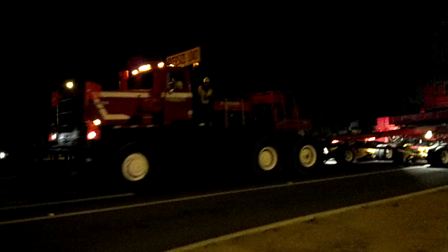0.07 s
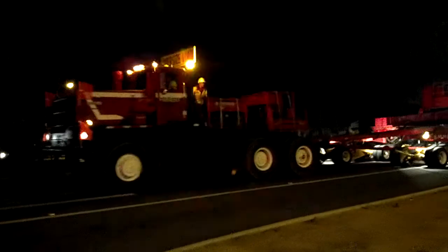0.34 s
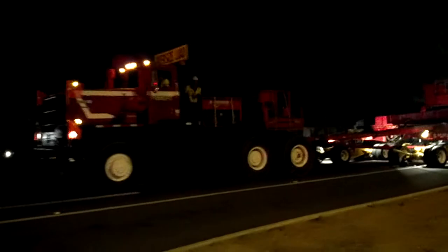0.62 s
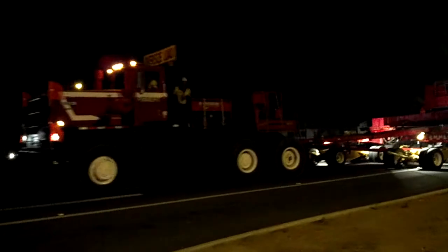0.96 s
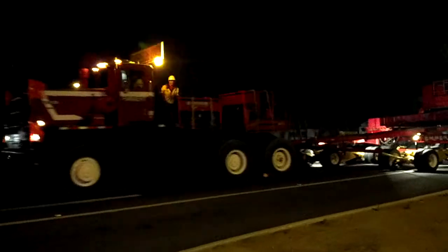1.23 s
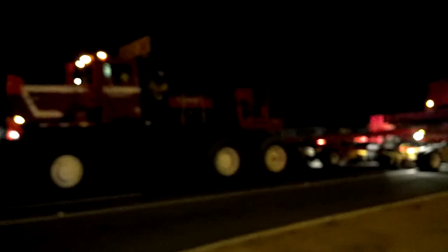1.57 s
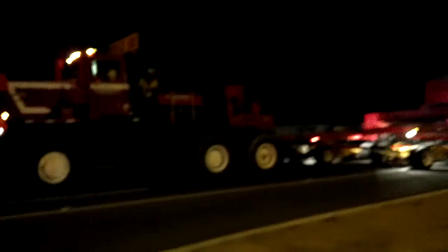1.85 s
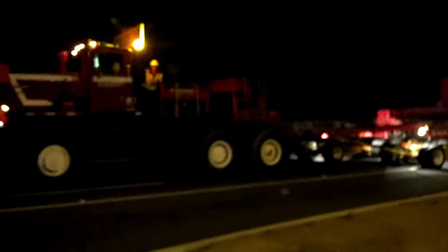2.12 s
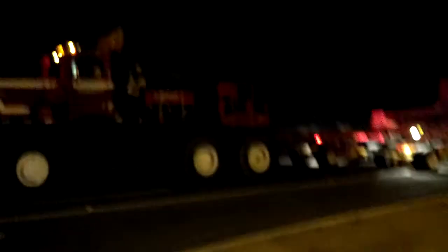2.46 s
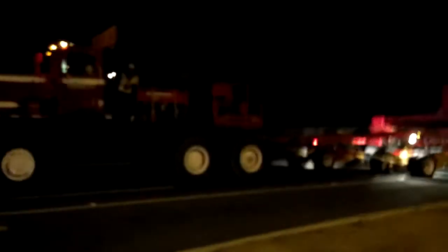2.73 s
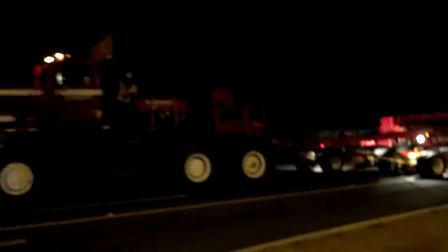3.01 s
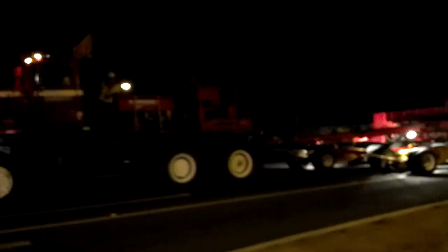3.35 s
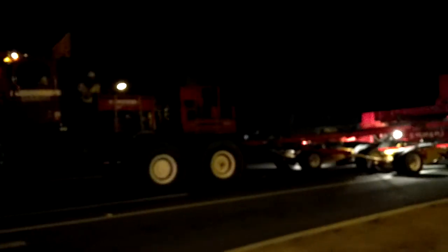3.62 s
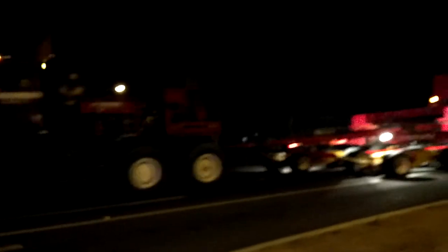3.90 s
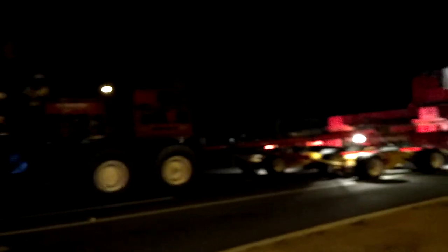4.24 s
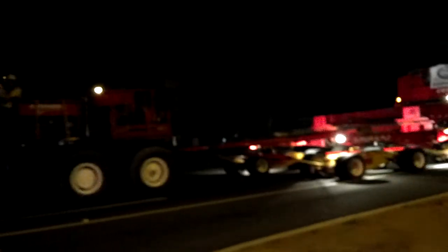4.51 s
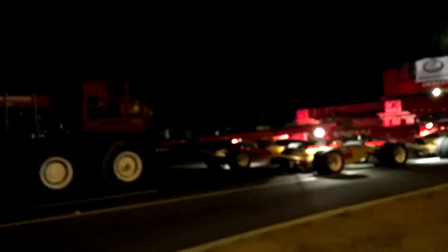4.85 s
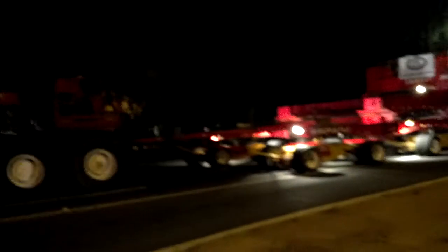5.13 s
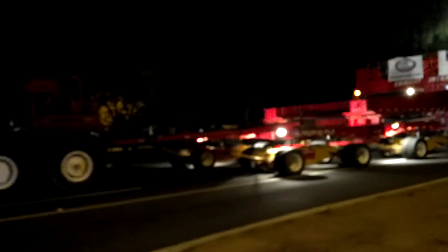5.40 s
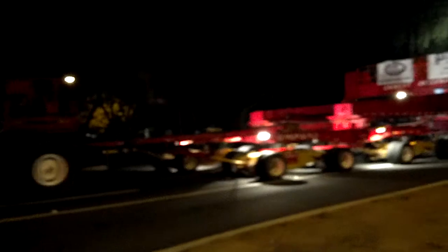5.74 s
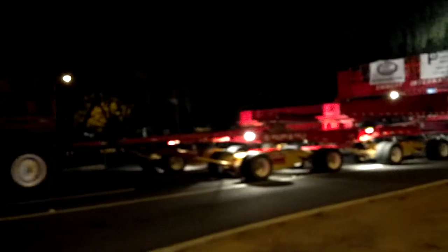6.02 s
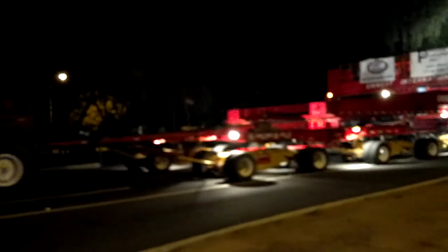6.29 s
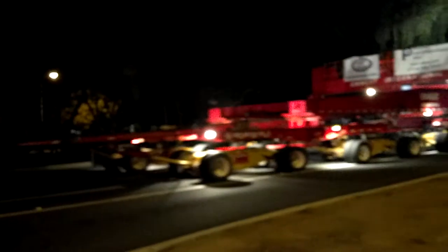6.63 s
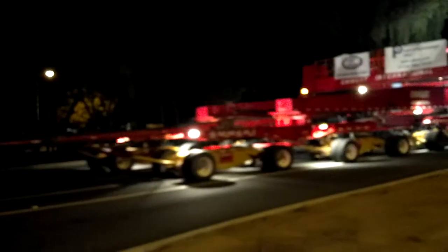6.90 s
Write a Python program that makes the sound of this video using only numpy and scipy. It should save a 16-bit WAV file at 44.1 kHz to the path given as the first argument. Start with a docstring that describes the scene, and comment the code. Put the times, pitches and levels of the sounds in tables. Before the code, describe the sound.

A deep diesel throb fades in as a heavy truck crawls along a road, hauling a long trailer. The exhaust rumbles steadily while the engine roars and clatters, passing close by. Loose steel clinks lightly now and then, and a belt gives two faint, very high bouts of chirping. A fan hum and the drone of the trailer's power unit grow toward the end, in wide stereo.

```python
"""A deep diesel throb fades in: a heavy tractor crawls past, hauling a trailer with a droning power pack.
The firing cylinders make the exhaust rumble, the engine block roar and the valve gear clatter.
A cooling fan hums, gears whine faintly, a slipping belt chirps in two bouts and loose steel clinks.
Two close microphones hear the rig go by, and their stereo image is widened."""
import sys
import numpy as np
from scipy.fft import rfft, irfft, next_fast_len
from scipy.io import wavfile
from scipy.ndimage import map_coordinates

SR = 44100
rng = np.random.default_rng(int(sys.argv[2]) if len(sys.argv) > 2 else 0)


def generate_wav(signal):
    """Clip the signal to [-1, 1] and save it as 16-bit WAV at the path in sys.argv[1]."""
    frames = np.transpose(np.atleast_2d(signal))
    scaled = np.clip(frames, -1, 1) * 32767
    pcm = np.round(scaled).astype(np.int16)
    wavfile.write(sys.argv[1], SR, pcm)


N = 311346
T = np.arange(N) / SR

SHAFT_HZ, PACK_HZ = 22.46, 70.12  # crankshaft turns and power pack beats per second
CYLINDERS, FAN_BLADES, SPEED_M_PER_S = 6, 7, 1.8

# gear whines: (f/Hz, level/dB)
GEAR_WHINES = [(447, -51), (581, -51.5), (629, -51), (839, -52.5), (982, -52), (1906, -60), (2151, -51.5),
               (2290, -54)]
# clinks of loose steel: (t/s, relative level/dB, f/Hz, time to die by 60 dB/s, scrape against ring/dB)
CLINKS = [(1.672, -43, 6000, .12, -2), (2.02, -43, 6460, .1, 2), (2.3444, -42, 6500, .1, 3),
          (2.582, -39, 6300, .12, -7), (3.2994, -35, 6200, .11, -12), (3.3594, -41, 6200, 0.11, -4),
          (3.6884, -37, 6300, .07, -5), (3.782, -30, 3700, 0.077, -12), (3.8694, -37, 6350, .11, -7),
          (4.0432, -33, 6090, 0.054, -9), (4.3959, -35.5, 6240, .15, -13), (5.1716, -36, 7170, 0.13, -4),
          (5.8894, -36, 6590, 0.2, -10), (6.1609, -32, 6230, .07, -16), (6.4782, -35, 6230, .06, -14),
          (6.8409, -34.5, 6900, .12, -9)]
# bouts of belt slip: (loudest at t/s, level/dB, f/Hz, fall in pitch/(Hz per s))
BELT_SLIPS = [(2.29, -46.3, 14000, 350), (6.798, -46.5, 14270, 1100)]
# hums as the rig shows different sides: (t/s, fan level/dB, its octave/dB, power pack's octave/dB)
HUM_LEVELS = [(1.25, -28, -45, -47), (1.75, -36, -36, -43), (2.3, -26.5, -42, -30), (3.1, -32, -48, -34),
              (3.75, -27.5, -35, -40), (4.25, -26, -34.5, -28), (4.8, -27.5, -27.5, -23.5),
              (5.3, -22.5, -36, -24), (5.6, -22.5, -36.5, -26), (6.35, -20, -33.5, -28),
              (7.0, -19.5, -37, -27)]
# the power pack's casing, hidden while the tractor is alongside: (t/s, level/dB)
CASING_LEVELS = [(1.8, -41), (2.7, -38), (3.4, -39.5), (4.3, -43), (4.6, -42.5), (5.05, -42.5), (5.4, -38),
                 (6.0, -37), (6.6, -39)]
# brief swells and dips of the engine sound: (t/s, level change/dB)
SWELLS = [(2.44, 1.2), (2.68, -0.5), (3.0, 1.2), (3.14, 0), (3.32, 2), (3.55, -1), (3.9, 0.5), (4.4, -2.7),
          (5.02, -2), (5.55, 0.7), (6.3, 0.7), (6.72, -0.8), (6.95, -0.4)]
# ringing engine panels: (f/Hz, width/Hz, relative level/dB)
PANEL_RINGS = [(579, 17, -4.5), (729, 32, -8), (793, 30, -12.5), (847, 45, -10), (1020, 55, -10),
               (1147, 30, -10)]
# the tone colour of each noise: (f/Hz, relative level/dB)
SCRAPE_COLOUR = [(1500, -20), (3500, -8), (6400, -3), (10500, 1), (14000, -3), (15700, -12)]
PACK_COLOUR = [(60, -20), (150, -4), (260, 7), (370, 5.5), (520, -1), (640, -17), (900, -33)]
CASING_COLOUR = [(1300, -13), (1600, -0.5), (1750, 5), (1920, 10), (2050, 6), (2300, 1.5), (2800, -35),
                 (4000, -9.5)]
CLATTER_COLOUR = [(1200, -34), (2500, -2.5), (3400, 1.5), (4200, 0), (4600, -3), (5000, -3), (5600, -4.5),
                  (6300, -4.5), (7300, -7), (8300, -63), (11000, -56)]
SIZZLE_COLOUR = [(5000, -42), (7800, -0.5), (9000, 5), (10500, -3), (12500, 1), (14000, -3), (15000, -1),
                 (15700, -12)]
BLOCK_COLOUR = [(300, -56), (430, -13.5), (520, -3.5), (600, -0.5), (680, -2), (790, -1), (950, -5),
                (1200, -5.5), (1500, -12.5), (2000, -20.5), (3200, -15), (5000, -64)]
EXHAUST_COLOUR = [(20, -28), (45, -21), (80, -14), (97, -6.5), (115, 0), (190, -2.5), (250, -4), (330, -7),
                  (420, -15.5), (600, -22.5)]
# which stereo image is heard: (t/s, image: 0 = first, 1 = second, 2 = third, blended in between)
IMAGE_BLEND = [(1.2, 0.092), (2.55, 0.2), (3.1, 0.35), (4.95, 1.1), (5.25, 1.78), (7.06, 1.84)]
# the microphones' difference against their sum in each image: # (f/Hz, level/dB, share in step, share a quarter
# cycle out of step)
STEREO_FIRST = [(70, -22, 0.96, 0.04), (150, -20, 0.86, 0.11), (316, -20.5, -0.42, 0.54),
                (547, -8, 0.14, 0.61), (926, -12, -0.33, 0.56), (1550, 5, 0.37, 0.34),
                (1900, 2, 0.097, 0.51), (2300, 1, 0.57, 0.36), (3000, 7, -0.56, 0.28),
                (4500, 0, 0.5, -0.16), (6650, 4, 0.36, -0.01), (12000, 0.5, 0.21, 0.02)]
STEREO_SECOND = [(70, -20, 0.88, -0.28), (150, -21, 1, 0.46), (328, -13.5, 0.35, 0.43),
                 (560, -5.5, 0.34, 0.61), (970, -2.5, -0.2, 0.69), (1550, 8.5, 0.18, 0.35),
                 (1900, 4.5, 0.86, -0.16), (2300, 5.5, 0.69, 0.38), (3000, 2.5, 0.9, -0.31),
                 (4500, -0.5, 0.48, 0.067), (6300, 0, 0.6, -0.01), (12000, 1.5, 0.06, -0.02)]
STEREO_THIRD = [(70, -22, 0.87, 0.24), (150, -18, 0.61, 0.45), (330, -15, -0.18, 0.77),
                (600, -5.5, 0.03, 0.78), (1000, -1, -0.2, 0.63), (1550, 12, -0.6, 0.25),
                (1900, 1.5, -0.56, -0.74), (2300, -4, 0.05, -0.61), (3000, -1, 0.73, 0.02),
                (4500, -2, 0.45, 0.05), (6300, 2.5, 0.49, -0.01), (12000, 1, 0.02, 0.01)]


def amp(db):
    """Turn decibels into a gain."""
    return 10 ** (np.asarray(db) / 20)


def unit(x):
    """Scale to an average power of 1."""
    return x / np.sqrt(np.mean(x ** 2) + 1e-20)


def bump(x, width):
    """A smooth hump of height 1 around x = 0."""
    return np.exp(-(x / width) ** 2)


def wobble(rate):
    """A smooth random curve with rate new values a second."""
    return map_coordinates(rng.standard_normal(int(N * rate / SR) + 4), [T * rate], mode="nearest")


def over_pitch(rows, hz):
    """Read a table's columns at the frequencies hz, on a log scale."""
    freqs, *columns = np.transpose(rows)
    return [np.interp(np.log(hz + 1), np.log(freqs + 1), column) for column in columns]


def over_time(rows):
    """Read a table's columns at every sample."""
    times, *columns = np.transpose(rows)
    return [np.interp(T, times, column) for column in columns]


def filtered(x, response):
    """Filter x with a response given as a function of frequency."""
    size = next_fast_len(N + SR // 4, real=True)
    return irfft(rfft(x, size) * response(np.fft.rfftfreq(size, 1 / SR)), size)[..., :N]


def coloured(x, colour):
    """Give x a tone colour that ends at the table's last row, at power 1."""
    return unit(filtered(x, lambda hz: amp(over_pitch(colour, hz)[0]) * (hz < colour[-1][0])))


def add(out, start_s, sound):
    """Mix a short sound into out."""
    part = out[..., round(start_s * SR):][..., :sound.shape[-1]]
    part += sound[..., :part.shape[-1]]


def passing(loudest_at_m, half_power_m, db):
    """Level in dB of a part rolling by: direct sound weakens with distance, scattered sound stays."""
    near = 1 / (1 + ((SPEED_M_PER_S * T - loudest_at_m) / half_power_m) ** 2)
    scattered_share = 0.044
    return db + 10 * np.log10(scattered_share + (1 - scattered_share) * near)


def stretch(at_m, width_m):
    """Rises to 1 and falls again as the rig rolls over a stretch of road."""
    return bump(SPEED_M_PER_S * T - at_m, width_m)


def drone(cycles, db, waver_db, drift_rad):
    """A tone that wavers in level and phase."""
    return amp(db + waver_db * wobble(15)) * np.sin(2 * np.pi * cycles + drift_rad * wobble(12))


def gears(turns):
    """Gears whine faintly in step with the shaft; higher whines drift more."""
    return sum(drone(hz * turns / SHAFT_HZ, db, waver_db=4.0, drift_rad=hz / 1280)
               for hz, db in GEAR_WHINES)


def belt(turn_s=0.045, second_squeak_s=0.0127):
    """A slipping belt squeaks twice a turn and rubs around each squeak; a bout swells, sags and fades."""
    out = np.zeros(N)
    t = np.arange(-SR // 60, SR // 60) / SR

    def rasp(hz, width_s, blur_hz):
        """A brief, rough tone."""
        pitch_hz = hz + blur_hz * rng.standard_normal(len(t))
        return bump(t, width_s) * np.sin(2 * np.pi * np.cumsum(pitch_hz) / SR)

    for peak_s, db, pitch_hz, sag in BELT_SLIPS:
        turn_lags = np.arange(-9, 10) * turn_s
        grips_db = rng.uniform(-1, 1, len(turn_lags))  # the belt grips differently on every turn
        for turn_lag, grip_db in zip(turn_lags, grips_db):
            for lag in turn_lag, turn_lag + second_squeak_s:
                size_db, detune_hz, late_s = rng.standard_normal(3) * (1.4, 70, 0.0007)
                hz = pitch_hz - sag * lag + detune_hz
                squeak = amp(size_db) * rasp(hz, width_s=0.0022, blur_hz=900)
                rub = amp(-11) * rasp(hz, width_s=0.009, blur_hz=2200)
                gain = amp(db - grip_db) * bump(lag, 0.33)
                add(out, peak_s + lag + late_s + t[0], gain * (squeak + rub))
    return out


def fittings(attack_s=0.0006, blur_hz=1530):
    """Loose steel clinks: each piece rings at its own rough pitch under a bright scrape."""
    rings, scrape_gain = np.zeros((2, N)), np.zeros(N)
    age = np.arange(SR // 4) / SR
    for start_s, db, ring_hz, decay_s, scrape_db in CLINKS:
        envelope = amp(db - 60 * age / decay_s) * (1 - np.exp(-age / attack_s))
        pitch_hz = ring_hz + blur_hz * rng.standard_normal((2, len(age)))
        ring = unit(np.sin(2 * np.pi * np.cumsum(pitch_hz, axis=1) / SR))
        add(rings, start_s, envelope * ring)
        add(scrape_gain, start_s, envelope * amp(scrape_db))
    scrapes = scrape_gain * coloured(rng.standard_normal((2, N)), SCRAPE_COLOUR)
    return amp(-5.5) * (rings + scrapes)


def fan_and_pack_hums(turns, pack_cycles):
    """The fan's blades and the power pack's exhaust each hum a note and the octave above it."""
    fan_db, fan_octave_db, pack_octave_db = over_time(HUM_LEVELS)
    fan = drone(FAN_BLADES * turns, fan_db, waver_db=0.6, drift_rad=0.055)
    fan += drone(2 * FAN_BLADES * turns, fan_octave_db, waver_db=1.5, drift_rad=0.26)
    pack = drone(pack_cycles, passing(6.6, 2.1, db=-26), waver_db=1.5, drift_rad=0.03)
    pack += drone(2 * pack_cycles, pack_octave_db, waver_db=0.4, drift_rad=0.1)
    return fan + pack


def combustion(turns, repeat_share):
    """Noise of burning fuel, direct and scattered; part of it repeats every two turns of the shaft."""
    size = round(2 * SR / SHAFT_HZ)
    overtones = np.exp(2j * np.pi * rng.random((2, size // 2 + 1)))
    cycle = unit(irfft(overtones, size))
    repeating = cycle[:, (turns / 2 % 1 * size).astype(int)]
    return np.sqrt(repeat_share) * repeating + np.sqrt(1 - repeat_share) * rng.standard_normal((2, N))


def firings(strokes):
    """Each cylinder in turn gives a dying knock of its own strength."""
    sizes = np.exp(rng.standard_normal(CYLINDERS))
    knocks = sizes[strokes.astype(int) % CYLINDERS] * np.exp(-3 * (strokes % 1))
    return unit(knocks - knocks.mean())


def hard_firings(strokes):
    """Now and then a cylinder fires harder: a sudden jump that dies away within the stroke."""
    sizes = rng.exponential(size=N // 100)[strokes.astype(int)] ** 2
    knocks = np.tanh(sizes * np.exp(-2 * (strokes % 1)) / 4)
    return unit(knocks - knocks.mean())


def pack_rumble(shake):
    """The power pack rumbles, pulsing with its own beat."""
    pulsing = rng.standard_normal((2, N)) * amp(1.4 * shake)
    return amp(passing(13.2, 3.8, db=-33.5)) * coloured(pulsing, PACK_COLOUR)


def pack_casing(turns, throb_db):
    """The power pack's shaken casing gives a bright, throbbing buzz."""
    buzz = combustion(turns, repeat_share=0.26) * amp(throb_db)
    return amp(over_time(CASING_LEVELS)[0]) * coloured(buzz, CASING_COLOUR)


def valve_gear(turns, throb_db, bay_db):
    """Valve gear and chains chatter with the engine's cycle and at random, under a high sizzle."""
    chatter_db = throb_db + 0.43 * np.cos(np.pi * turns) + 0.84 * wobble(40) + 0.74 * wobble(160)
    chatter = combustion(turns, repeat_share=0.065) * amp(chatter_db)
    clatter = amp(passing(8.63, 4.83, db=-40)) * coloured(chatter, CLATTER_COLOUR)
    hiss = rng.standard_normal((2, N)) * amp(1.1 * chatter_db + 0.7 * wobble(300))
    sizzle = amp(passing(1.3, 10.2, db=-52.5) + bay_db) * coloured(hiss, SIZZLE_COLOUR)
    return clatter + sizzle


def engine_block(turns, throb_db, flutter_db=1.6):
    """The block roars and shakes its panels, whose narrow rings come and go."""
    roar = coloured(combustion(turns, repeat_share=0.25) * amp(throb_db), BLOCK_COLOUR)
    rings = 0
    for hz, width, db in PANEL_RINGS:
        ring = filtered(roar, lambda f: 1j * f * width / (hz * hz - f * f + 1j * f * width))
        rings += amp(db + flutter_db * wobble(3.97)) * ring
    return amp(passing(4.35, 6.2, db=-33)) * unit(roar + rings)


def exhaust(turns, knock):
    """The exhaust rumbles with each firing; the cab hides it for a moment."""
    puffs = combustion(turns, repeat_share=0.13) * amp(0.57 * knock + 0.77 * wobble(28))
    cab_db = -3.5 * stretch(at_m=2.84, width_m=0.15)
    return amp(-25 + cab_db) * coloured(puffs, EXHAUST_COLOUR)


def diesels(turns, pack_cycles):
    """The beats of the tractor's engine and the power pack make their noisy parts throb."""
    strokes = turns * CYLINDERS / 2
    knock, hard = firings(strokes), hard_firings(strokes)
    lope = unit(np.exp(-4 * (turns % 1)) - 1 / 4)  # one heavier beat each turn of the shaft
    shake = np.cos(2 * np.pi * pack_cycles)
    blades = np.cos(2 * np.pi * FAN_BLADES * turns)
    bay_db = 0.9 * stretch(at_m=4.3, width_m=0.72)  # the engine bay faces the microphones
    grille_db = 0.95 * stretch(at_m=4.28, width_m=0.47)  # the open grille lets out more roar
    swell_db = sum(db * bump(T - at_s, 0.075) for at_s, db in SWELLS)
    puffs = exhaust(turns, knock)
    rumble = pack_rumble(shake)
    roar = engine_block(turns, 0.62 * hard + 0.35 * knock + 0.5 * lope + 0.37 * shake)
    buzz = pack_casing(turns, 0.7 * lope + 0.61 * shake + 0.3 * blades + 0.5 * hard)
    clatter = valve_gear(turns, 0.18 * knock + 0.62 * hard + 0.13 * lope + 0.19 * shake, bay_db)
    body = amp(bay_db + grille_db) * (puffs + roar) + buzz
    return rumble + amp(swell_db) * body + amp(0.84 * swell_db) * clatter  # the treble swells less


def microphone_difference(direct, scattered, image):
    """What differs between the two microphones in one stereo image."""
    def response(hz):
        db, in_step, quarter_cycle = over_pitch(image, hz)
        direct_gain = in_step + 1j * quarter_cycle
        scattered_gain = np.sqrt(np.clip(1 - abs(direct_gain) ** 2, 0, 1))
        return amp(db) * np.array([direct_gain, scattered_gain])
    return filtered(np.array([direct, scattered]), response).sum(axis=0)


def scene():
    """The whole rig at two microphones; the stereo image glides from one image to the next."""
    turns = np.cumsum(SHAFT_HZ * (1 + 0.001024 * wobble(3))) / SR
    pack_cycles = np.cumsum(PACK_HZ * (1 + 0.0018 * wobble(4.23))) / SR
    direct, scattered = diesels(turns, pack_cycles) + fittings()
    direct = direct + fan_and_pack_hums(turns, pack_cycles) + gears(turns) + belt()
    blend = over_time(IMAGE_BLEND)[0]
    side = np.zeros(N)
    for index, image in enumerate([STEREO_FIRST, STEREO_SECOND, STEREO_THIRD]):
        weight = np.maximum(1 - abs(blend - index), 0)
        side += weight * microphone_difference(direct, scattered, image)
    return np.array([direct + side, direct - side])


def record(dry):
    """Widen the image by taking a late copy of each channel from the other; fade in; cut the top."""
    delay_s, top_hz = 17 / SR, 15750
    fade_start_s, fade_length_s = 0.718, 1.27
    wide = dry - filtered(dry[::-1], lambda hz: np.exp(-2j * np.pi * hz * delay_s))
    fade = np.clip((T - fade_start_s) / fade_length_s, 0, 1) ** 0.8  # steepest at first
    return filtered(wide * fade, lambda hz: hz < top_hz)


dry = scene()
out = record(dry)
generate_wav(out)
```